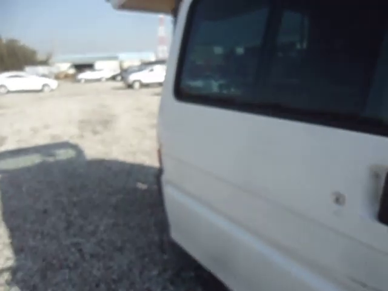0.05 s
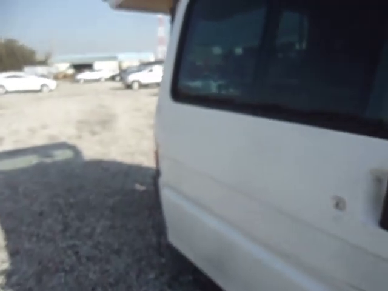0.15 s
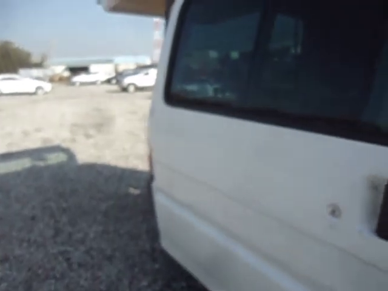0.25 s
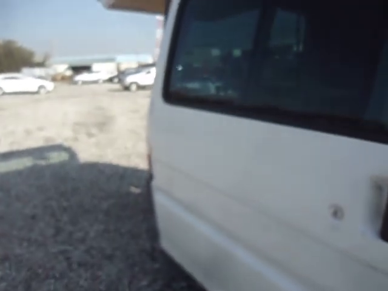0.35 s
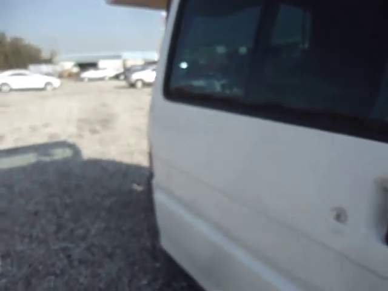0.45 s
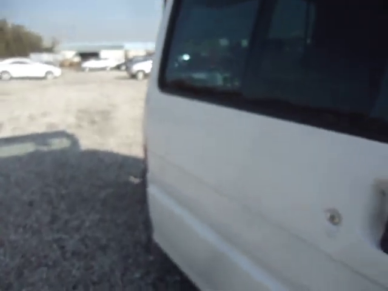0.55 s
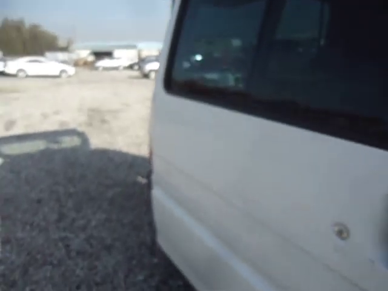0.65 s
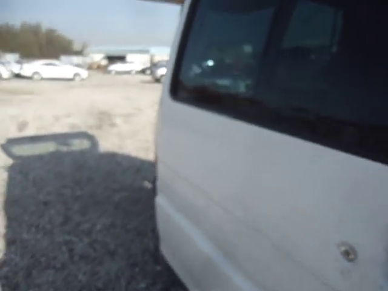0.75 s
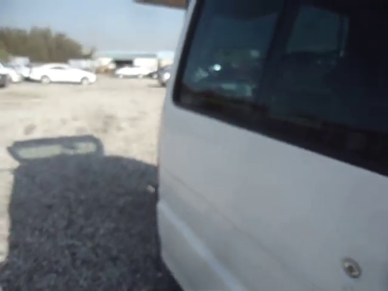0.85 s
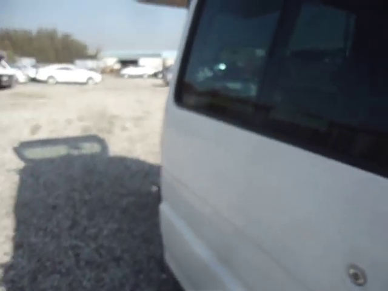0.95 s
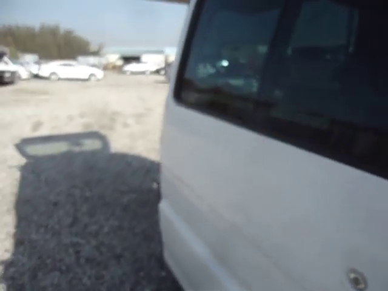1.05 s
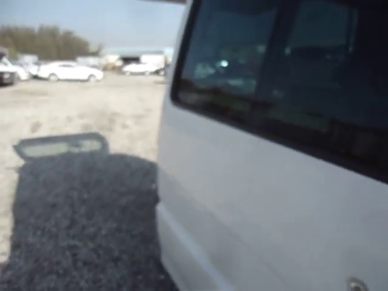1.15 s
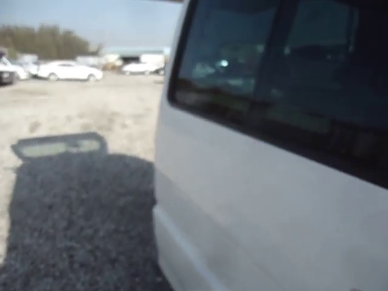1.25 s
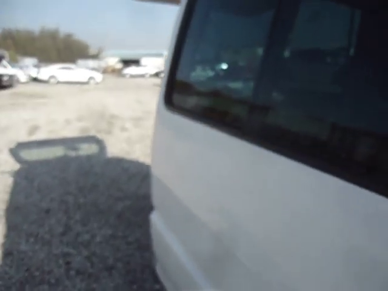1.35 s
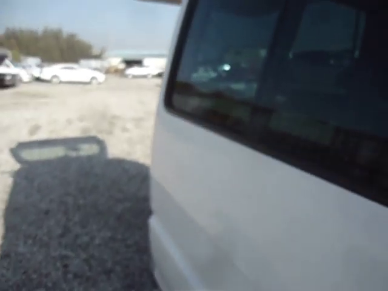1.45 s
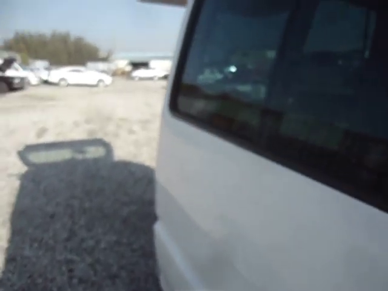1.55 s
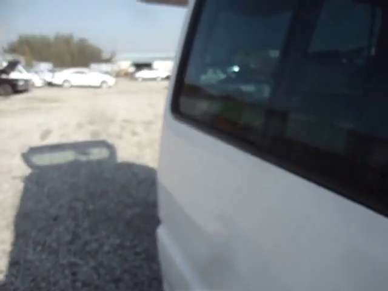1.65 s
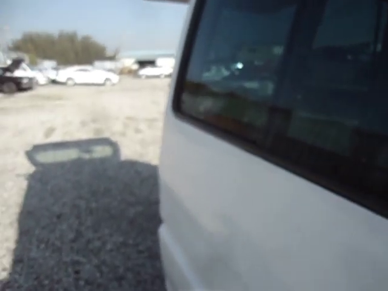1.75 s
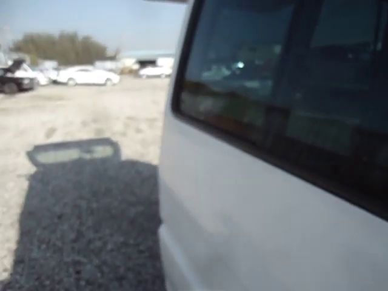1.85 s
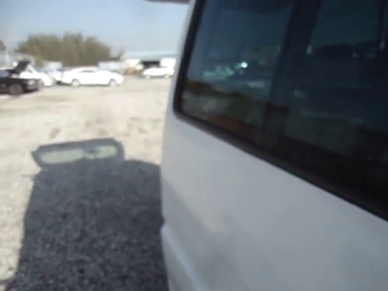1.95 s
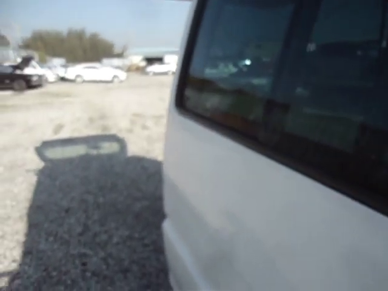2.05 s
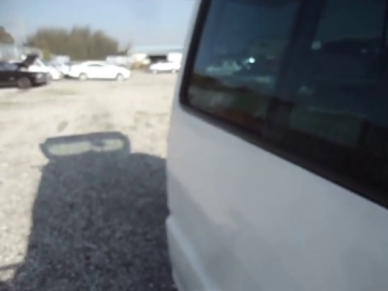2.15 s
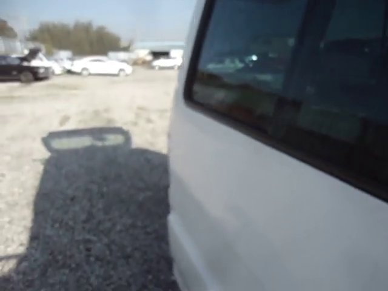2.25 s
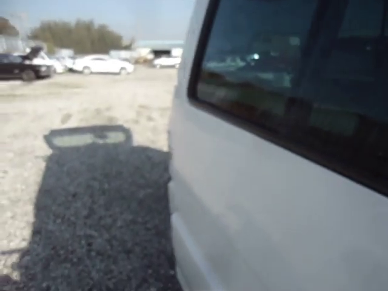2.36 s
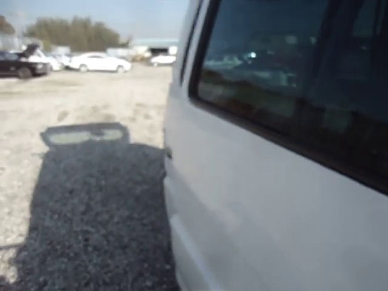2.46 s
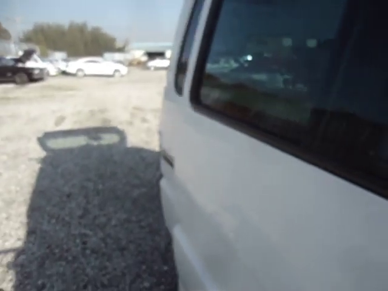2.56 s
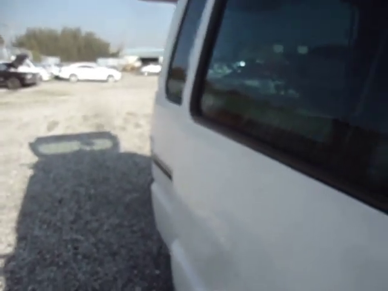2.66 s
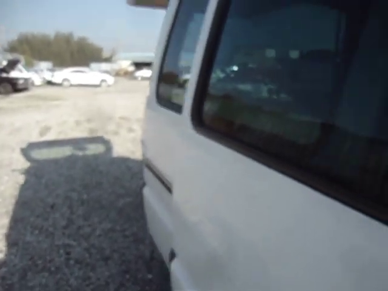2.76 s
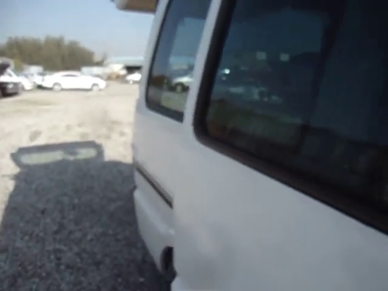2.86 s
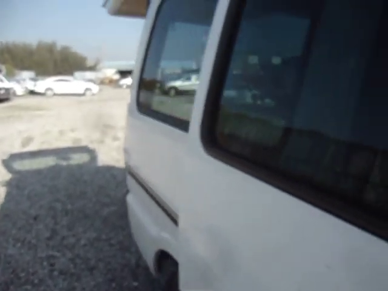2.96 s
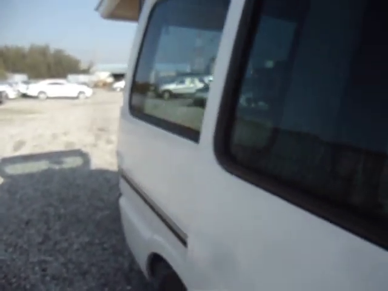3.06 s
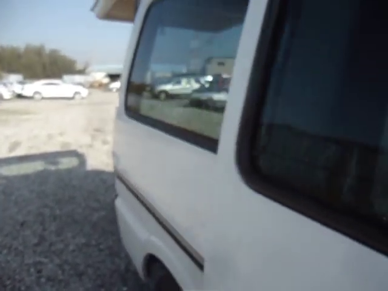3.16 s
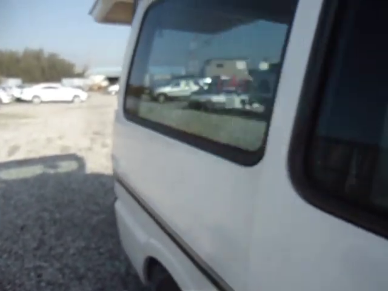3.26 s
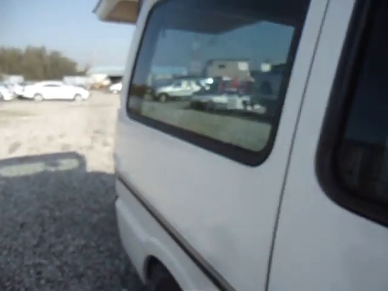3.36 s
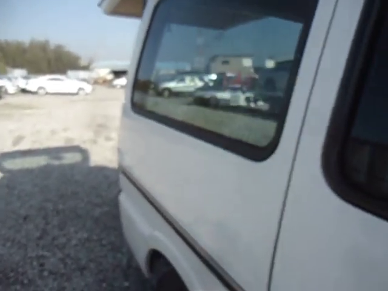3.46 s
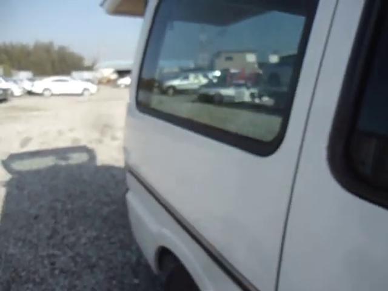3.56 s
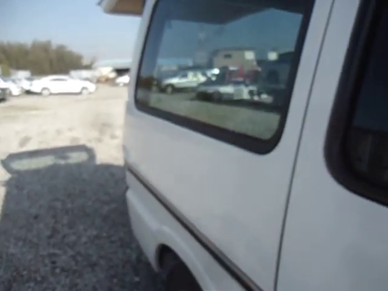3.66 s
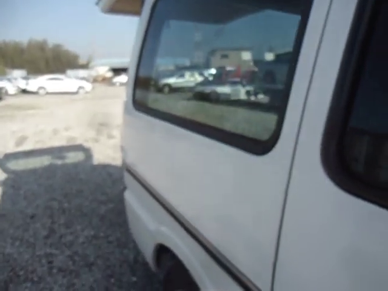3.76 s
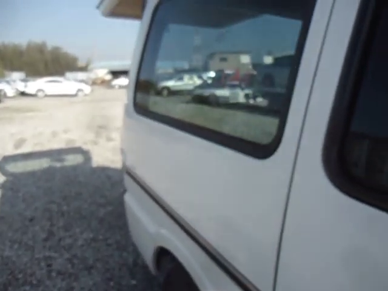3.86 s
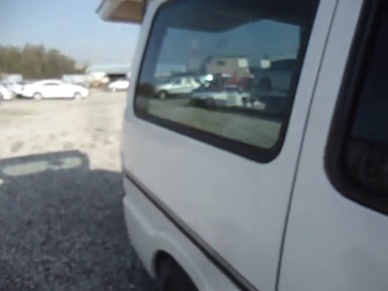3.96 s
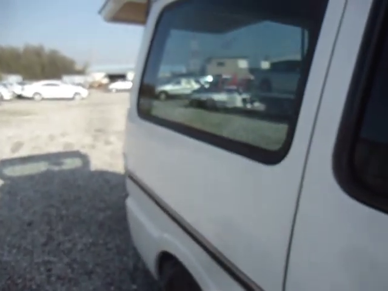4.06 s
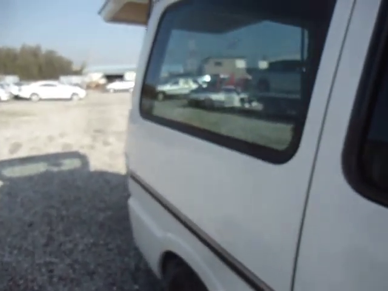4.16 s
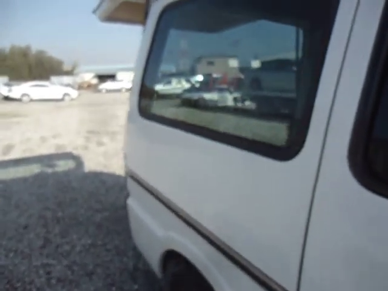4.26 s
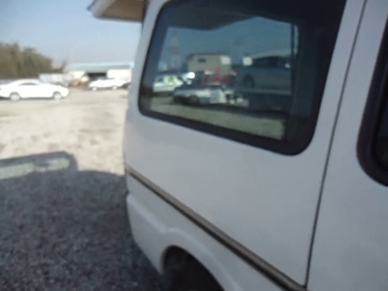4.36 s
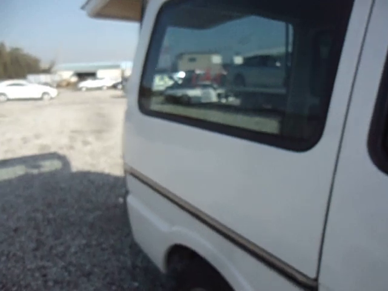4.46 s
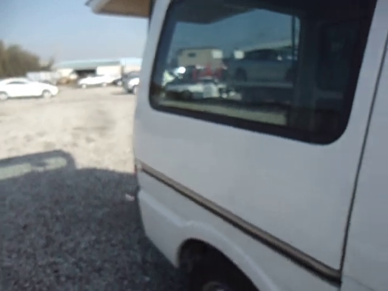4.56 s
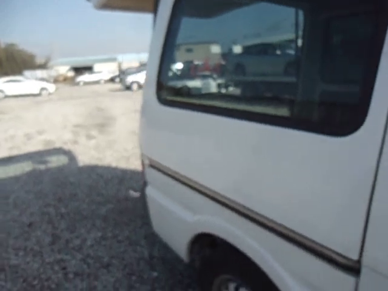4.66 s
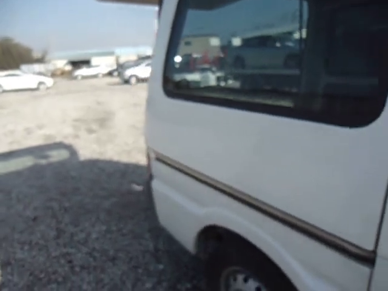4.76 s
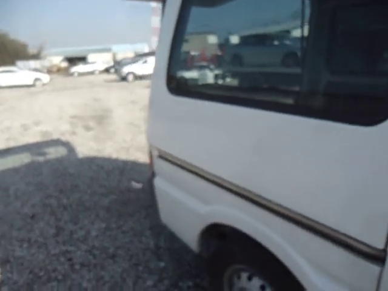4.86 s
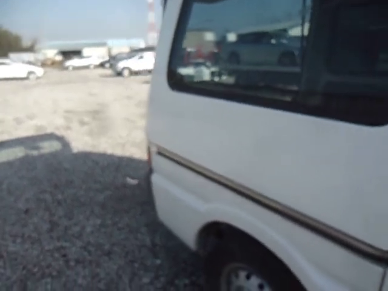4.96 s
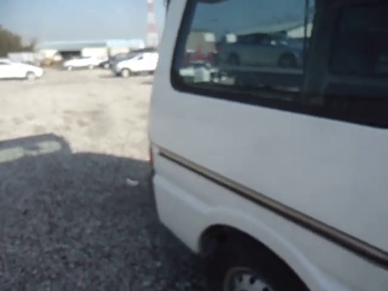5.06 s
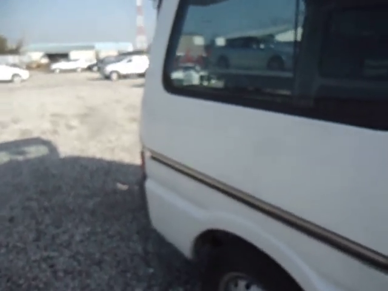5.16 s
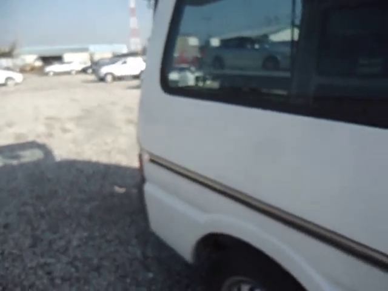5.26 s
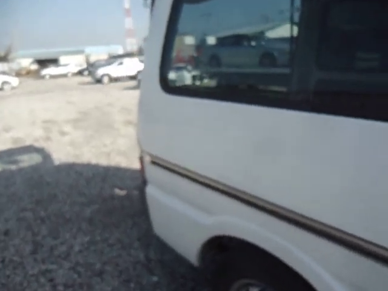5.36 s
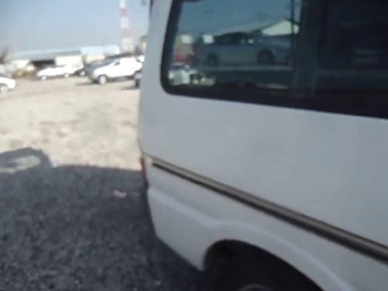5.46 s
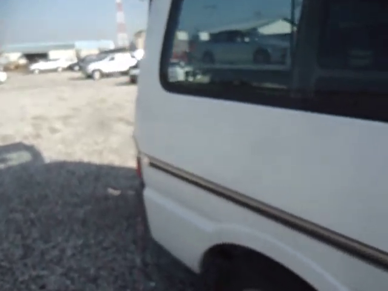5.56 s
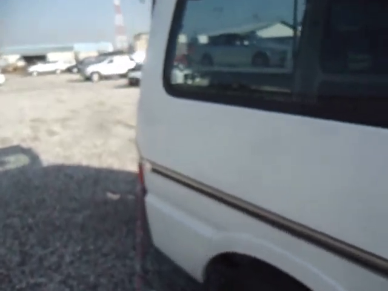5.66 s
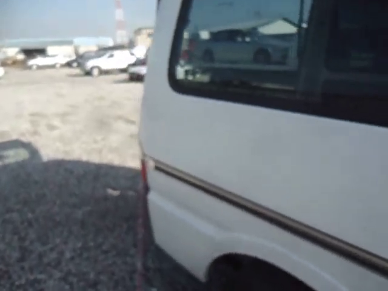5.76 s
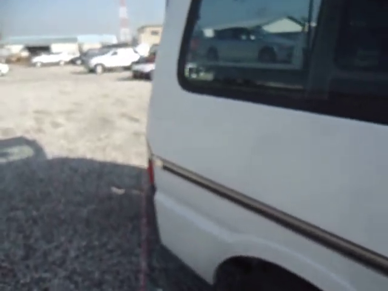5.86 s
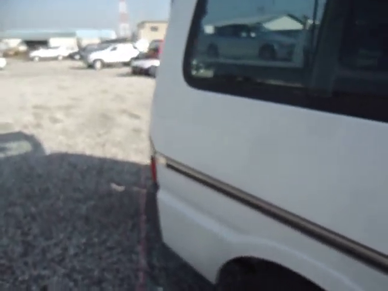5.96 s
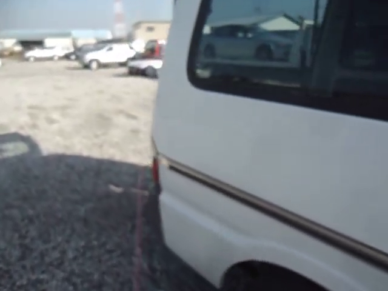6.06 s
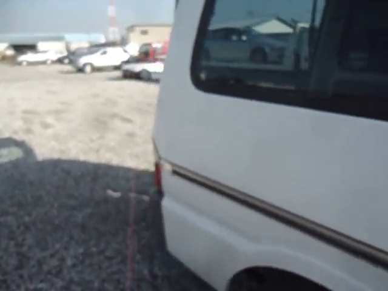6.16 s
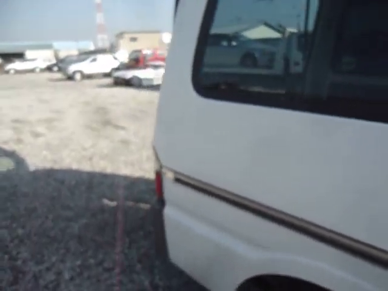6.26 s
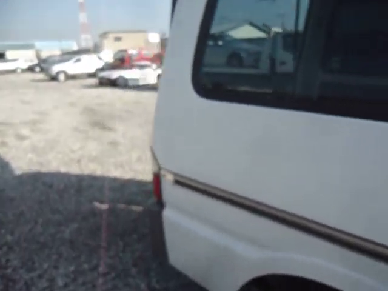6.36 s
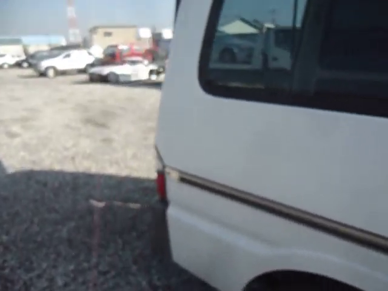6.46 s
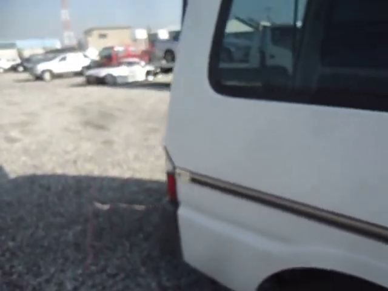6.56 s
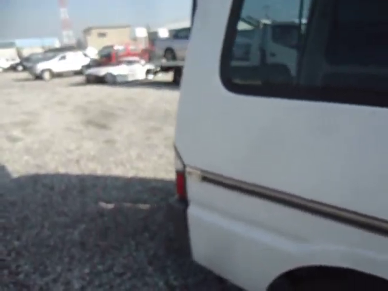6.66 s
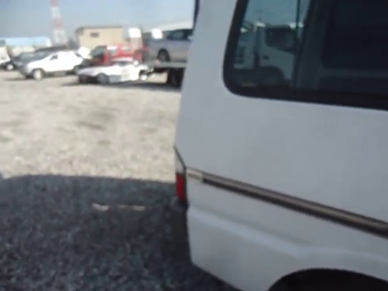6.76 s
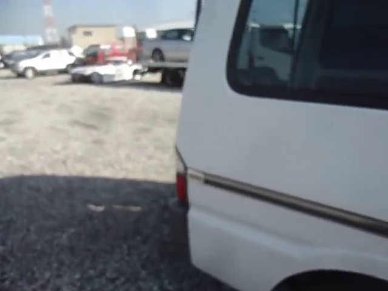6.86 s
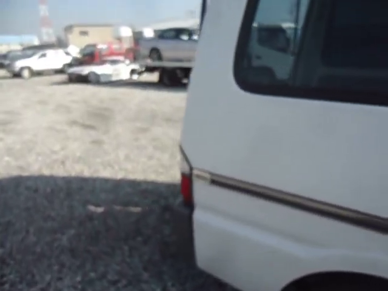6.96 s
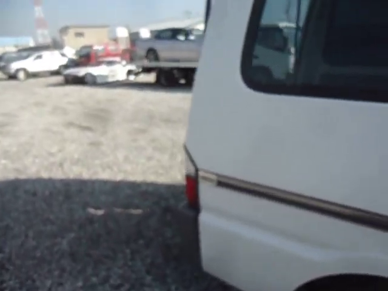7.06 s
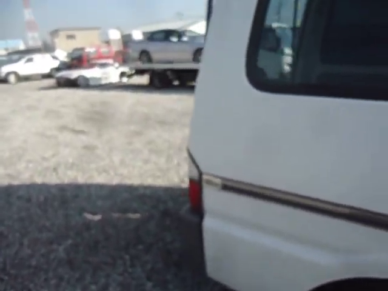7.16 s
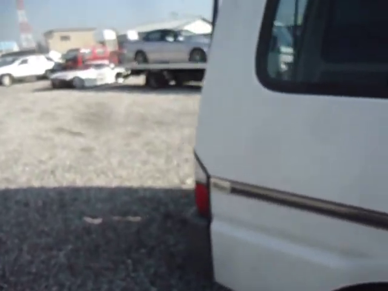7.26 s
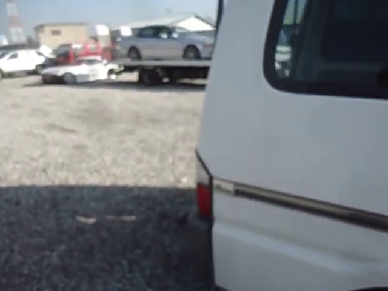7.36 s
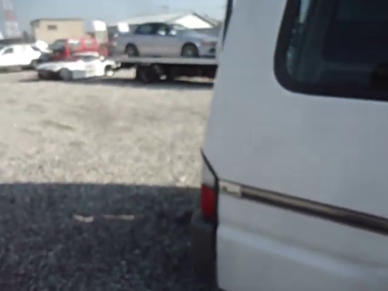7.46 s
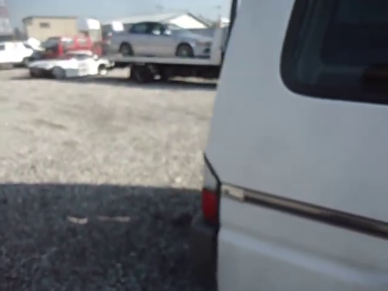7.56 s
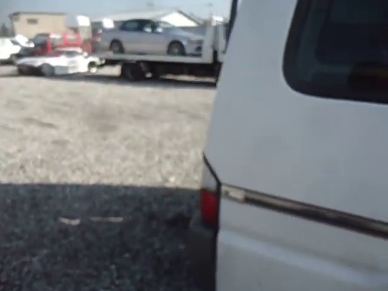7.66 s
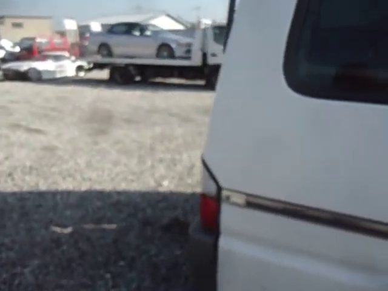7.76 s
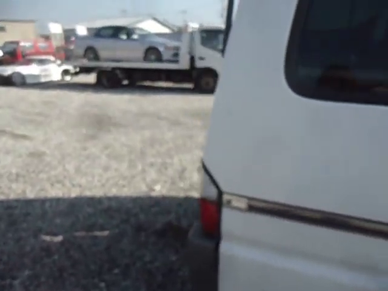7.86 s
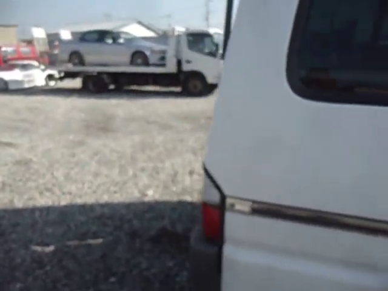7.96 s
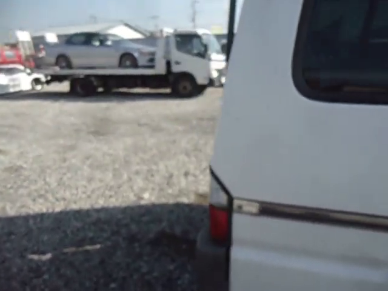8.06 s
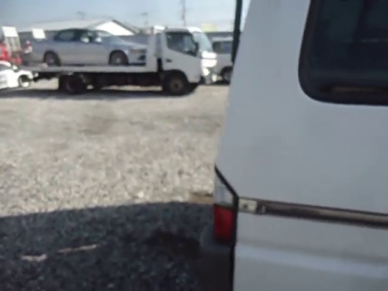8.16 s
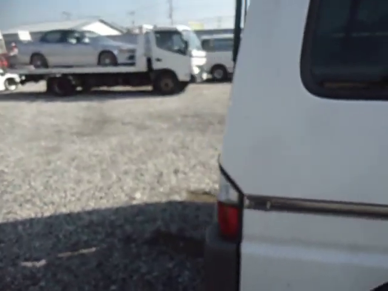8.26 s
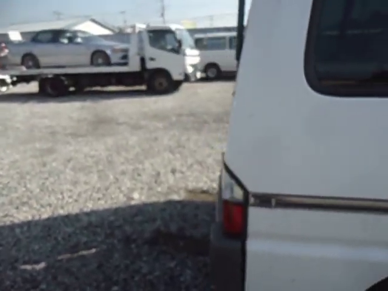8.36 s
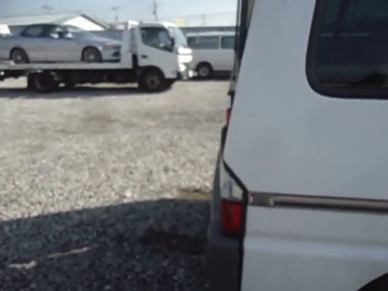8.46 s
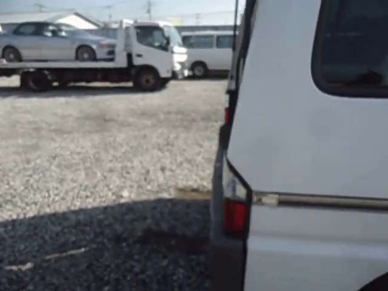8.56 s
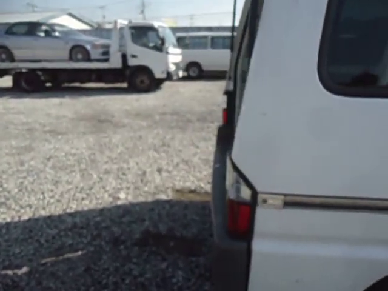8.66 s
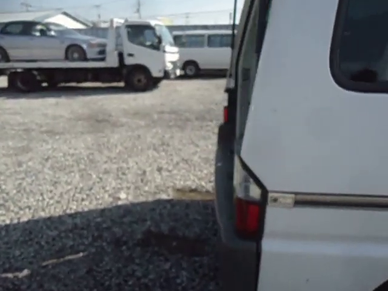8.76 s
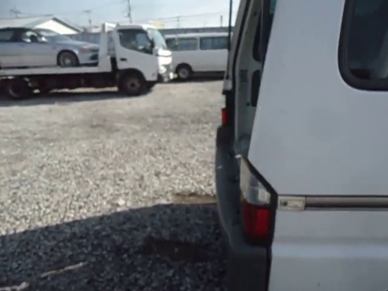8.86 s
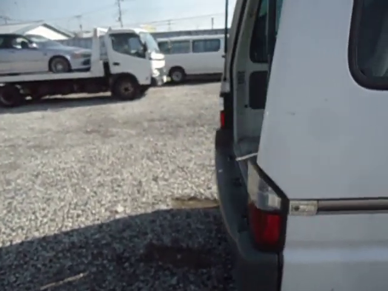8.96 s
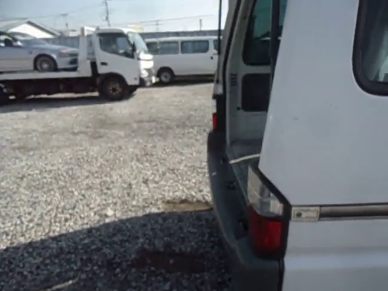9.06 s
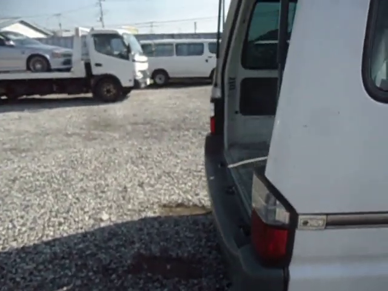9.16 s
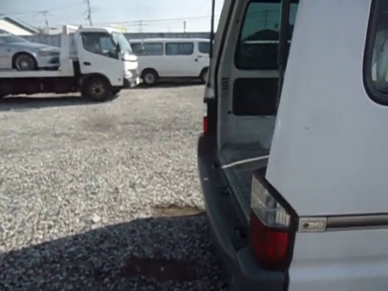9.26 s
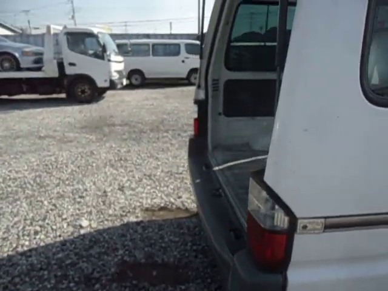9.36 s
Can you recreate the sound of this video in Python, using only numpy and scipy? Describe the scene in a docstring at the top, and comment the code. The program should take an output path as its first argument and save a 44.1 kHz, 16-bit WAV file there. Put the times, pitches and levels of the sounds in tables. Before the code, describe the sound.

A van idles with a low, wavering hum and soft clatter in an open gravel lot, light breeze on the microphone. A footstep and stone knocks come first, then the sliding door rolls with a gritty, drumming rumble and slams loudly, overloading the small close microphone. A short rattle follows, then more crunching footsteps and small clicks over the idle.

```python
"""A van's sliding door, close by, rolls along its track, catches the latch, slams and rattles to rest:
grit noise, short scrapes and sines sound through the door's ringing modes, over a noise tail.
Behind it the van idles on a gravel lot (wavering sines, throbbing noise) in a light breeze (low noise).
Footsteps crunch the gravel before and after the door (filtered grains), with knocks and close clicks.
The slam overloads the small microphone's narrow input stage, and the gain dips after it."""
import sys
import numpy as np
from scipy import signal
from scipy.fft import rfft, irfft, next_fast_len
from scipy.io import wavfile
from scipy.ndimage import uniform_filter1d

SR = 44100
rng = np.random.default_rng(int(sys.argv[2]) if len(sys.argv) > 2 else 0)


def unload_audio(sound):
    """Save the sound as a 16-bit wav file, at the path given as the first command line argument."""
    columns = np.transpose(np.atleast_2d(sound))
    # keep every value between -1 and 1, then stretch to whole-number steps
    steps = np.round(np.clip(columns, -1, 1) * 32767)
    wavfile.write(sys.argv[1], SR, steps.astype(np.int16))


N = 414981
T = np.arange(N) / SR  # time in s

# Spectra below are relative: each sound is brought to a common level after it is coloured.
# Breeze on the microphone. Each row: frequency in Hz, density in dB per Hz.
WIND_SPECTRUM = [(15, -18), (30, 3.5), (60, 4.5), (90, -2.5), (150, -6), (250, -22), (500, -51.5)]
# Gusts over the steady breeze. Each row: time in s, peak in dB, fade in dB per s.
WIND_GUSTS = [(.11, -45, 101), (.41, -32, 41.5), (.63, -39, 60), (.75, -45.5, 8), (2.02, -40, 6.5),
              (4.58, -43, 58), (5.05, -36.5, 31), (6.0, -48, 24), (7.98, -46.5, 21), (8.9, -47, 12)]
# Engine as heard while the microphone moves along the van.
# Each row: time in s, boom level in dB, clatter level in dB, fan hiss in dB over the clatter.
IDLE_LEVELS = [(0, -47, -49.5, -6), (.6, -45, -50, -5), (1.3, -46, -49.5, -6), (2, -44.5, -52.5, -9),
               (4, -46, -53, -6.5), (6, -49.5, -54.5, -7.5), (7, -46.5, -54, -10), (8.6, -50, -52.5, -13),
               (9.41, -48, -52.5, -9.5)]
# Exhaust and body boom. Each row: multiple of the crank speed, relative level in dB, wavering in dB.
CRANK_ORDERS = [(2.01, -3, 3.5), (3.89, -2, -1.5), (5.84, -10, 8), (7.97, 4.5, 0.5), (9.93, -13, 6),
                (12.58, -21, 8), (15.87, -9, 3), (16.86, -4, 2), (18.13, -8.5, 0), (18.3, -18, 6),
                (23.97, -16.5, -2), (25.46, -15.5, 4.5), (26.57, -19.5, 2.5)]
# Engine bay, fan and distant lot. Each row: frequency in Hz, density in dB per Hz.
CLATTER_SPECTRUM = [(70, -23.5), (150, -10), (225, -4.5), (280, -10), (340, -13), (390, -13), (600, -16),
                    (1400, -18.5), (1900, -21), (2100, -24.5), (3150, -35), (3500, -34.5), (4200, -36),
                    (5000, -34.5), (5600, -49), (6200, -35), (8000, -68)]
# Fan hiss. Each row: frequency in Hz, density in dB per Hz.
FAN_SPECTRUM = [(1500, -32), (2200, -0.5), (2700, 2), (3150, 0.5), (3500, -12), (4500, -37.5)]
# Belt-driven parts. Each row: frequency in Hz, width in Hz,
# level at the start in dB relative to the clatter, fade in dB per s.
BELT_WHINES = [(1070, 8, -11, .6), (4950, 20, -20, 6)]
# Gravel crunching underfoot. Each row: start in s, length in s, dull crunch in dB, fine grit in dB.
FOOTSTEPS = [(1.096, .12, -66, -58.5), (1.2, 0.34, -57, -77), (4.687, 0.11, -55.5, -69.5),
             (5.3, .17, -55, -71), (5.554, 0.36, -62, -78), (5.798, 0.43, -67, -72.5),
             (7.102, .24, -60, -75), (7.498, 0.14, -56, -67), (7.657, 0.19, -50.5, -65),
             (8.3, .14, -60, -72), (9.04, .18, -51, -68)]
# Dull knocks of stones underfoot. Each row: start in s, peak in dB, pitch in Hz.
STONE_KNOCKS = [(1.242, -29, 1480), (1.259, -38, 1480), (1.286, -37, 867), (1.324, -35, 1260),
                (1.337, -36, 1360), (1.399, -41, 1480), (1.47, -40, 1290), (4.719, -41, 1070),
                (5.377, -39, 1020), (5.621, -36, 1160), (5.848, -38, 1200), (5.899, -37, 1420),
                (5.986, -41, 991), (6.045, -40, 1090), (6.313, -43, 1330), (6.445, -39, 929),
                (8.368, -36, 1300)]
# Bright clicks close to the microphone. Each row: start in s, peak in dB, pitch in Hz.
CLOSE_CLICKS = [(0.955, -37.5, 3220), (2.1211, -49, 3070), (5.188, -42, 4670), (5.198, -37, 4670),
                (5.289, -42, 3210), (7.001, -46.5, 4630), (7.1167, -44.5, 3030), (7.8396, -45, 3050)]
# Force of the rollers on the track. Each row: time in s, level in dB.
ROLLER_FORCE = [(2.05, -47.5), (2.25, -37.5), (2.3, -28), (2.42, -27), (2.56, -24), (2.7, -23), (3, -24.5),
                (3.2, -22.5), (3.25, -22)]
# Grit heard from the track. Each row: frequency in Hz, density in dB per Hz.
TRACK_SPECTRUM = [(47, -51.5), (80, -23.5), (145, -3.5), (201, -2), (236, -0.5), (304, -2), (503, 0.5),
                  (659, -4.5), (1090, -2.5), (4960, -36.5), (5940, -49), (7720, -91.5), (13100, -120)]
# Bursts in which the door panel drums. Each row: start in s, length in s, level in dB.
PANEL_DRUMS = [(2.31, 0.055, -31), (2.405, 0.032, -23), (2.45, 0.043, -22), (2.51, 0.033, -24),
               (2.545, 0.069, -19), (2.66, 0.13, -31), (3.03, .08, -26)]
# The rail sings where a roller binds. Each row: start in s, length in s, frequency in Hz, level in dB.
RAIL_BINDS = [(2.26, 0.041, 1230, -36), (2.52, 0.079, 904, -24), (2.59, 0.1, 1088, -23),
              (2.72, 0.16, 2090, -38.5), (2.87, 0.11, 1190, -30.5), (3.08, 0.14, 2700, -38),
              (3.12, 0.088, 1415, -32)]
# Door skin and frame, rung by rollers and blows alike.
# Each row: frequency in Hz, gain in dB, time to fade 60 dB in s.
DOOR_MODES = [(142, 5, 0.092), (223.4, 1.5, 0.16), (330, -4.5, 0.059), (506.4, -6.5, 0.17),
              (646, -2, 0.078), (733, -5.5, 0.033), (993, -2.5, 0.14), (1078, 0.5, 0.072),
              (1344, -0.5, 0.066), (1419, 0.5, 0.13), (1726, -8.5, .08), (2090, -5, 0.12),
              (2453, -11, 0.067), (2620, -7.5, 0.051), (3090, -14.5, 0.036), (3800, -23, 0.032),
              (4840, -27, 0.057), (5000, -33.5, .04)]
# Bumps on the track, latch and slam. Each row: start in s, peak in dB, tilt in dB per octave (about).
DOOR_BLOWS = [(2.278, -12, -1), (2.587, -15, -1.5), (2.891, -14, 0), (3.096, -9.5, -4), (3.26, 1.5, 1.5),
              (3.265, -0.5, 3), (3.28, -7, 1), (3.286, -6.5, 1), (3.296, -8.5, 2), (3.327, -9, 0.5),
              (3.345, -4.5, 5.5), (3.35, -1, 1.5), (3.355, 8, 1), (3.362, 3, 2), (3.37, -1, 2.5),
              (3.382, 0.5, -0.5), (3.392, 0, 6), (3.404, -6, -3.5), (3.413, -9, -2), (3.426, -6.5, -1),
              (3.438, -11.5, -0.5)]
# Ring of the latch striker. The row: start in s, frequency in Hz, level in dB before the swell,
# rise in s, time to fade 60 dB in s.
STRIKER_RING = (3.294, 1440, 4, .008, .05)
# Cabin air and body pushed by the slam. Each row: start in s, frequency in Hz,
# level in dB before the swell, rise in s, time to fade 60 dB in s.
SLAM_THUMPS = [(3.345, 22.4, 11.5, .045, .36), (3.3586, 54, -4, .03, .42), (3.37, 38, -8, .015, .8),
               (3.37, 85, -16, .01, .55), (3.37, 118, -10, .01, .4), (3.375, 165, -16, .01, .35)]
# Body ringing out after the slam. Each row: frequency in Hz, time to fade 60 dB in s.
BODY_DECAY = [(100, 0.27), (300, 0.53), (700, 0.44), (1500, 0.42), (3000, 0.22), (6000, 0.19)]
# A loose part rattling after the slam. Each row: start in s, peak in dB, pitch in Hz.
LOOSE_RATTLE = [(3.4727, -27, 2450), (3.53, -33.5, 3040), (3.578, -35, 3080), (3.626, -35, 3140),
                (3.669, -37, 2570), (3.7043, -45, 4930), (3.7367, -45, 2600), (3.8694, -40, 2820),
                (4.033, -46, 2670)]


def amp(db):
    """Decibels to amplitude."""
    return 10 ** (np.asarray(db) / 20)


def unit(x):
    """Brings x to rms 1."""
    return x / np.sqrt(np.mean(x ** 2) + 1e-20)


def read(points, hz):
    """Reads a table between its points on a log frequency scale."""
    f, value = np.transpose(points)
    return np.interp(np.log(hz + 1), np.log(f + 1), value)


def curves(rows):
    """Draws each column over time, the first column being seconds."""
    s, *columns = np.transpose(rows)
    return [np.interp(T, s, c) for c in columns]


def add(mix, s, sound):
    """Lays a sound into the mix at s seconds."""
    part = mix[round(s * SR):][:len(sound)]
    part += sound[:len(part)]


def drift(rate_hz):
    """Slow chance wandering of rms 1."""
    knots = np.arange(0, 10, .5 / rate_hz)
    return unit(np.interp(T, knots, rng.standard_normal(len(knots))))


def colour(x, spectrum):
    """Gives x a spectrum and rms 1."""
    size = next_fast_len(len(x))
    gain = amp(read(spectrum, np.fft.rfftfreq(size, 1 / SR)))
    return unit(irfft(rfft(x, size) * gain, size)[:len(x)])


def band(x, lo_hz, hi_hz):
    """Keeps the sound between two frequencies."""
    return signal.sosfilt(signal.butter(2, [lo_hz, hi_hz], "band", fs=SR, output="sos"), x)


def low_pass(x, hz, size):
    """Cuts the treble without delay."""
    taps = signal.firwin(size, hz, window=("kaiser", 9), fs=SR)
    return signal.oaconvolve(x, taps[None], "same")


def ring(x, hz, t60):
    """One resonant mode: its response to a click peaks near 1 and fades 60 dB in t60 seconds."""
    r = np.exp(-np.log(1000) / (t60 * SR))
    w = 2 * np.pi * hz / SR
    return signal.lfilter([np.sin(w)], [1, -2 * r * np.cos(w), r * r], x)


def grains(rate_hz, spread_db):
    """Sparse clicks of uneven size and either sign."""
    size_db = spread_db * np.minimum(rng.exponential(1, N), 5)
    size = amp(size_db) * rng.choice([-1., 1.], N)
    return size * (rng.random(N) < rate_hz / SR)


def swing(s, hz, db, rise, t60):
    """Start time and a sine that swells in and dies away, first moving negative."""
    t = np.arange(SR) / SR
    envelope = amp(db - 60 * t / t60) * (1 - np.exp(-t / rise))
    return s, -envelope * np.sin(2 * np.pi * hz * t)


def swells(rows):
    """Gain that swells and fades once for each row."""
    out = np.zeros(N)
    for s, length, db in rows:
        add(out, s, amp(db) * np.hanning(round(length * SR)))
    return out


def ticks(rows, length, t60, ringing):
    """A quick crack with a short rustle, part of it ringing briefly at its own pitch."""
    out, t = np.zeros(N), np.arange(2048) / SR
    for s, db, hz in rows:
        rustle = 0.31 * rng.standard_normal(len(t)) * np.exp(-t / length)
        burst = rustle + (t == 0)
        lo_hz, hi_hz = 0.56 * hz, min(2.2 * hz, 8000)
        crack = band(band(burst, lo_hz, hi_hz), lo_hz, hi_hz)
        rung = ring(crack, hz, t60)
        mixed = (1 - ringing) * crack / abs(crack).max() + ringing * rung / abs(rung).max()
        add(out, s, amp(db) * mixed)
    return out


def wind():
    """Lumpy low rumble of moving air; gusts arrive quickly and fade."""
    breeze_db, rise_s = -53.5, 0.036
    gain = amp(breeze_db)
    for s, db, fade_db in WIND_GUSTS:
        gain = gain + np.clip((T - s) / rise_s, 0, 1) * amp(db - fade_db * abs(T - s))
    return gain * amp(1.2 * drift(12)) * colour(rng.standard_normal(N), WIND_SPECTRUM)


def engine():
    """Wavering crank orders boom under a clatter that throbs with each firing, fan hiss and belt whine."""
    crank_hz = 13.2
    boom_db, clatter_db, fan_db = curves(IDLE_LEVELS)
    turns = np.cumsum(crank_hz * (1 + .002 * drift(6.6))) / SR
    boom = np.zeros(N)
    for order, db, waver_db in CRANK_ORDERS:
        boom += amp(db + waver_db * drift(5)) * np.sin(2 * np.pi * (order * turns + rng.random()))
    throb = 1 + .2 * np.exp(-(2 * turns % 1) / .25)  # two firings a turn
    clatter = colour(rng.standard_normal(N) * throb + 0.45 * unit(grains(400, 3.5)), CLATTER_SPECTRUM)
    clatter /= np.std(band(clatter, 500, 3500))  # its level is that of its mids
    fan = amp(fan_db + 1.5 * drift(21)) * colour(rng.standard_normal(N), FAN_SPECTRUM)
    whine = np.zeros(N)
    for hz, width_hz, db, fade_db in BELT_WHINES:
        whine += amp(db - fade_db * T) * unit(ring(rng.standard_normal(N), hz, 2.2 / width_hz))
    machinery = amp(clatter_db + 0.5 * drift(12)) * (clatter + fan + whine)
    return np.sqrt(2) * amp(boom_db) * boom + machinery


def steps():
    """Stones grind past each other while weight comes onto the foot."""
    crunch = np.zeros(N)
    for hz, db in [(600, -0.5), (1100, -12), (1500, -2.0), (2400, -9)]:
        crunch += ring(grains(500, 2.5), hz, 0.0097) * amp(db)
    grit = band(grains(2000, 2.9), 3200, 5500)
    crunch_gain = swells((s, length, db) for s, length, db, _ in FOOTSTEPS)
    grit_gain = swells((s, length, db) for s, length, _, db in FOOTSTEPS)
    return crunch_gain * unit(crunch) + grit_gain * unit(grit)


def stone_knocks():
    """Stones knock dully together: a short crack, over half of it ringing."""
    return ticks(STONE_KNOCKS, length=.004, t60=.015, ringing=.55)


def close_clicks():
    """Bright clicks close to the microphone: mostly crack, with a very short ring."""
    return ticks(CLOSE_CLICKS, length=0.0055, t60=.004, ringing=0.3)


def loose_part():
    """A loose part rattles after the slam: each contact is a crack with a longer rustle."""
    return ticks(LOOSE_RATTLE, length=0.016, t60=.015, ringing=0.31)


def door_ring(x):
    """Passes a force through the door's modes, in alternating sign."""
    return sum((-1) ** k * amp(db) * ring(x, hz, t60) for k, (hz, db, t60) in enumerate(DOOR_MODES))


def rail():
    """Friction noise swells through one narrow resonance of the rail."""
    out = np.zeros(N)
    for s, length, hz, db in RAIL_BINDS:
        rub = rng.standard_normal(SR // 4)[:round(length * SR)]
        song = unit(ring(ring(rub, hz, 0.022), hz, 0.016))
        add(out, s, amp(db) * song * np.hanning(len(rub)))
    return out


def rollers():
    """Grit under the wheels shakes the door; speed brightens it, the panel drums in bursts."""
    panel_hz = 512.7
    fade_in_s, fade_out_s = 0.097, 0.18
    level_db, = curves(ROLLER_FORCE)
    start, end = ROLLER_FORCE[0][0], ROLLER_FORCE[-1][0]
    grit = rng.standard_normal(N) * amp(1.68 * drift(40)) + 0.57 * unit(grains(250, 2.4))
    body = 1.22 * colour(grit, TRACK_SPECTRUM) + 0.3 * unit(door_ring(grit))
    drum = unit(ring(ring(grit * amp(2.0 * drift(35)), panel_hz, 0.041), panel_hz, 0.044))
    mids = unit(band(body, 282, 1300))
    treble = band(band(body, 1200, 5400), 900, 8300)
    rumble = band(body, 130, 345)
    # As the door gathers speed each layer shifts against the mids: dB at the start, dB per s.
    layers = [(treble, -11.5, 9.65), (drum, -2, -8), (rumble, 5.8, -15)]
    rolled_s = np.clip(T - start, 0, end - start)
    shifting = np.zeros(N)
    for layer, db, db_per_s in layers:
        shifting += amp(db + db_per_s * rolled_s + 1.5 * drift(12)) * unit(layer)
    moving = np.interp(T, [start, start + fade_in_s, end, end + fade_out_s], [0, 1, 1, 0])
    return moving * amp(level_db) * (mids + shifting) + swells(PANEL_DRUMS) * drum


def slam_tail():
    """The air thump, then the whole body rings out, each frequency at its own rate."""
    out = np.zeros(N)
    for row in SLAM_THUMPS:
        add(out, *swing(*row))
    hz, t, noise = signal.stft(rng.standard_normal(SR), SR, nperseg=512)
    shape = [(60, -1), (150, 2), (500, -14.5), (1500, -24.5), (3000, -24), (6000, -35.0)]  # Hz, dB
    fading_db = read(shape, hz)[:, None] - 60 * t / read(BODY_DECAY, hz)[:, None]
    tail = signal.istft(noise * amp(fading_db), SR, nperseg=512)[1]
    onset = 1 - np.exp(-np.arange(len(tail)) / SR / 0.0087)
    add(out, 3.37, amp(-10.0) * tail / np.std(tail[:2000]) * onset)
    return out


def blows():
    """Each blow is a short scrape, heard directly and through the door's modes; the striker rings too."""
    scrape_s, rise_s, seated_s = 0.0062, 0.00036, 3.34
    # share heard through the modes, less once the door presses on its seal
    ring_free, ring_seated = 0.57, 0.2
    out, t = np.zeros(N), np.arange(8192) / SR
    envelope = np.exp(-t / scrape_s) * (1 - np.exp(-t / rise_s))
    for s, db, tilt_db in DOOR_BLOWS:
        tilt = [(100, -3 * tilt_db), (800, 4.5), (5000, 3 * tilt_db - 14.0),
                (6400, 3 * tilt_db - 29.5), (9000, -49)]
        scrape = colour(rng.standard_normal(len(t)), tilt) * envelope
        rung = door_ring(scrape)
        share = ring_seated if s > seated_s else ring_free
        add(out, s, amp(db) * ((1 - share) * scrape / abs(scrape).max() + share * rung / abs(rung).max()))
    add(out, *swing(*STRIKER_RING))
    return out


def scene():
    """Breeze, idling van, footsteps and the door, summed to one channel."""
    background = wind() + engine()
    ground = steps() + stone_knocks() + close_clicks()
    door = rail() + rollers() + slam_tail() + blows() + loose_part()
    return (background + ground + door)[None]


def record(dry):
    """Gain control ducks loud sound and creeps back; the microphone stage saturates and is band-limited;
    what still overshoots is cut flat and splashes treble."""
    duck_from_db, duck_share, duck_s, recover_db_per_s = -19, 0.45, 0.21, 3
    microphone_hz, edge_hz, top = 5650, 16000, .7
    power = uniform_filter1d(dry[0] ** 2, size=2000, origin=999)  # mean of the last 45 ms
    power_db = 10 * np.log10(abs(power) + 1e-12)
    wanted_db = duck_share * np.maximum(power_db - duck_from_db, 0)
    # the deepest cut so far holds, less the steady recovery
    recovered_db = recover_db_per_s * T
    cut_db = np.maximum.accumulate(wanted_db + recovered_db) - recovered_db
    keep = np.exp(-1 / (duck_s * SR))
    ducked = dry / amp(signal.lfilter([1 - keep], [1, -keep], cut_db))
    squeezed = ducked / (1 + abs(ducked / top) ** 6) ** (1 / 6)
    limited = low_pass(squeezed, microphone_hz, size=151)
    return low_pass(np.clip(limited, -top, top), edge_hz, size=255)


dry = scene()
out = record(dry)
unload_audio(out)
```